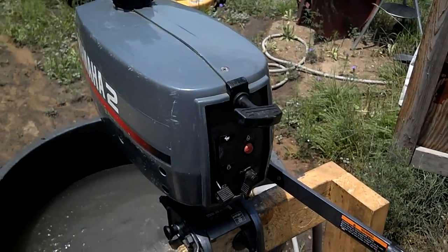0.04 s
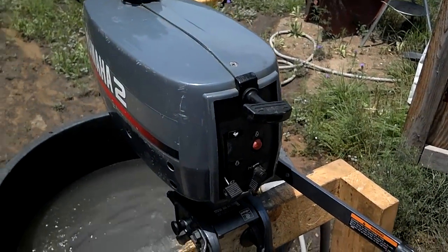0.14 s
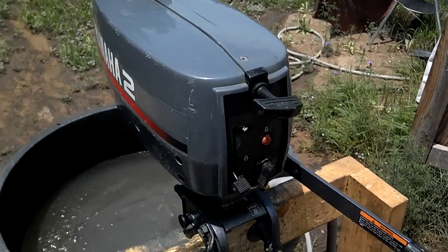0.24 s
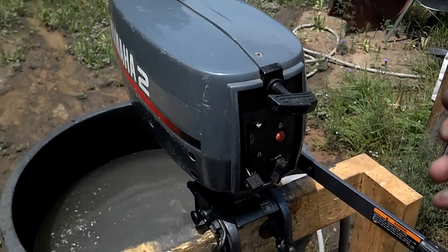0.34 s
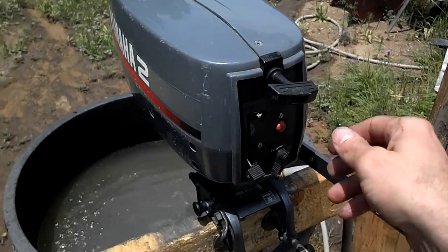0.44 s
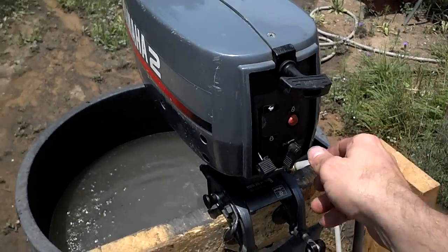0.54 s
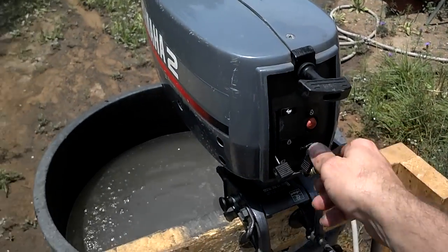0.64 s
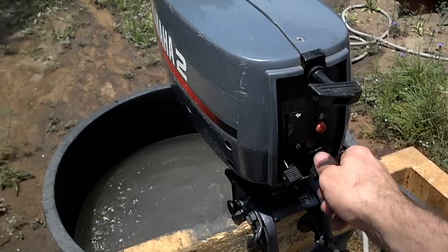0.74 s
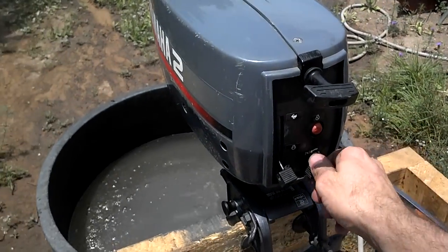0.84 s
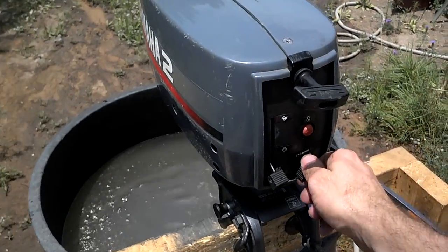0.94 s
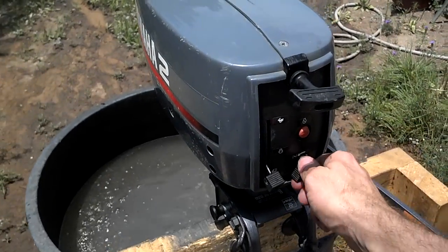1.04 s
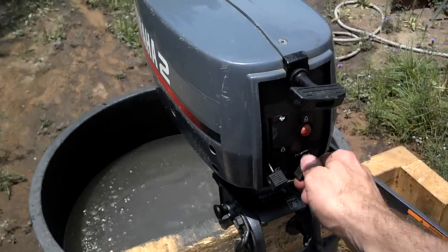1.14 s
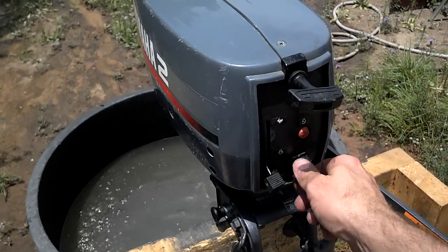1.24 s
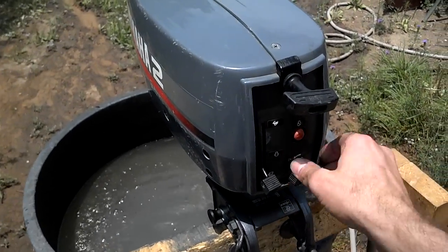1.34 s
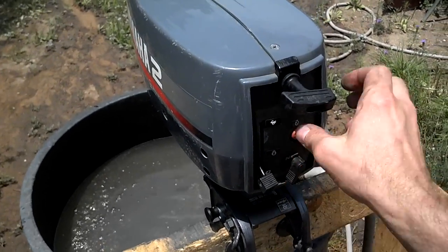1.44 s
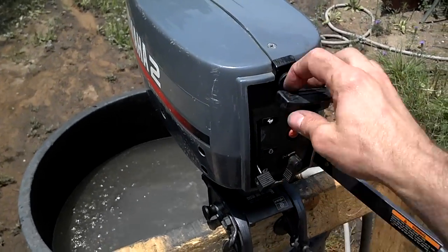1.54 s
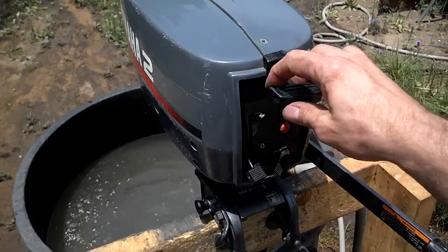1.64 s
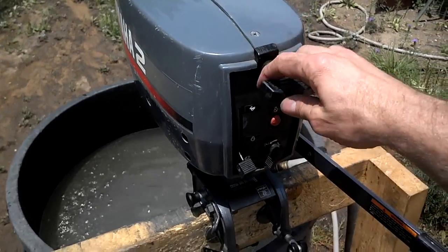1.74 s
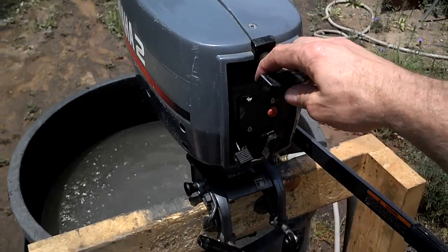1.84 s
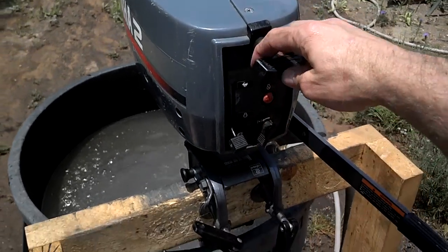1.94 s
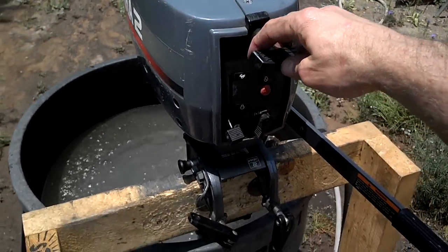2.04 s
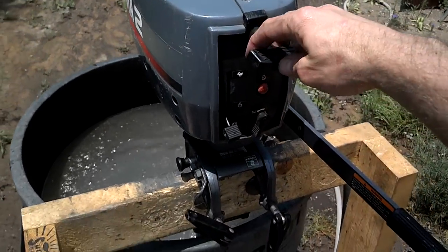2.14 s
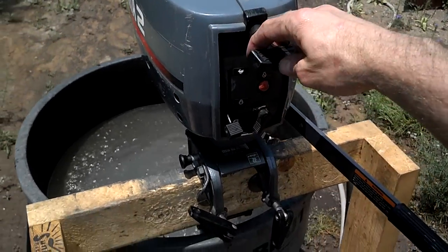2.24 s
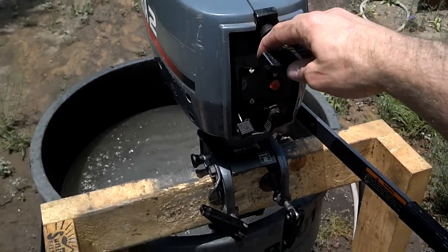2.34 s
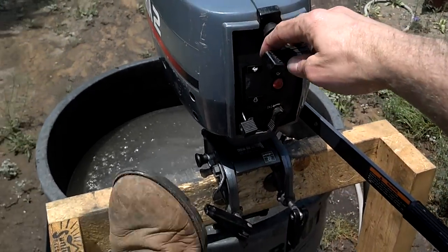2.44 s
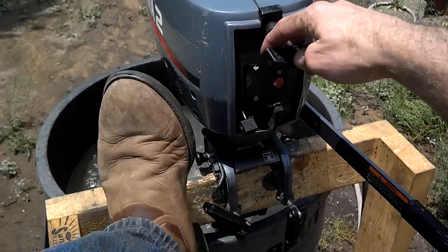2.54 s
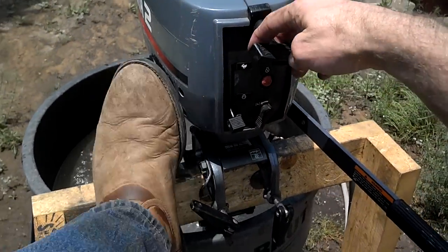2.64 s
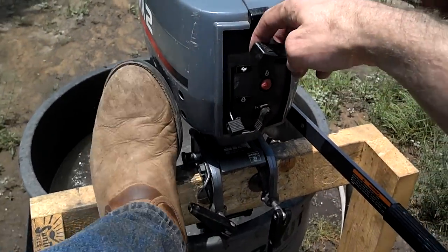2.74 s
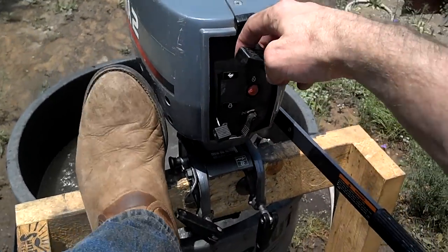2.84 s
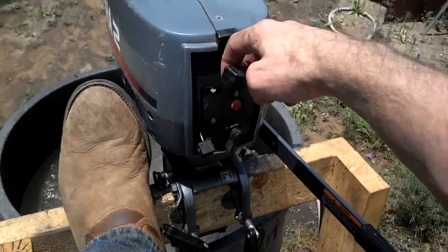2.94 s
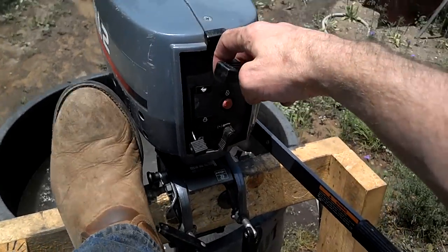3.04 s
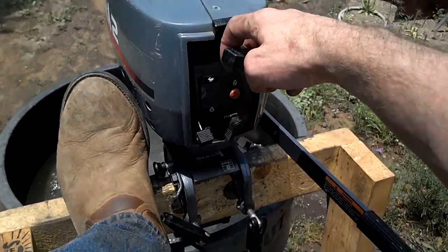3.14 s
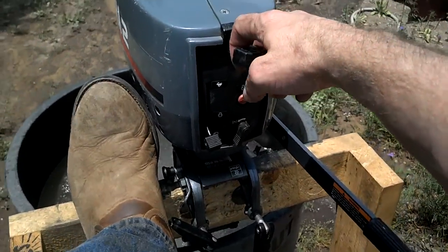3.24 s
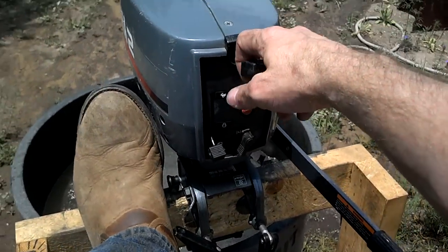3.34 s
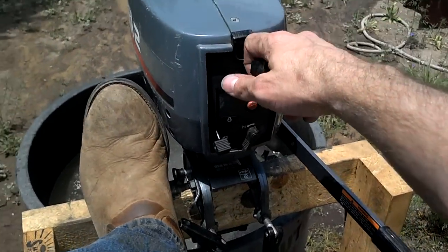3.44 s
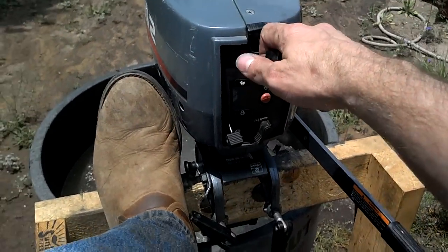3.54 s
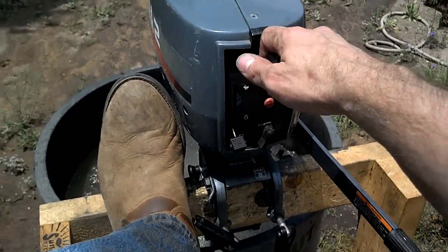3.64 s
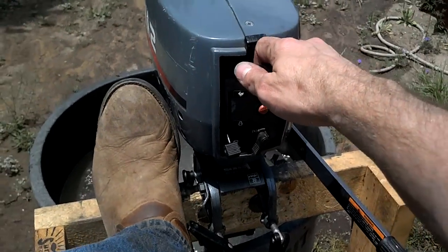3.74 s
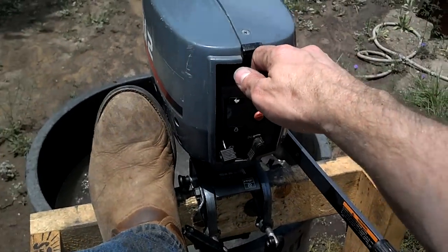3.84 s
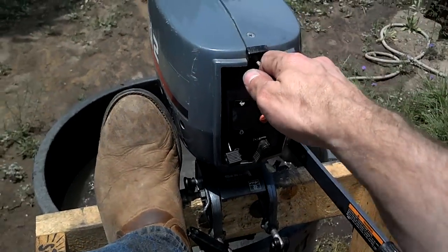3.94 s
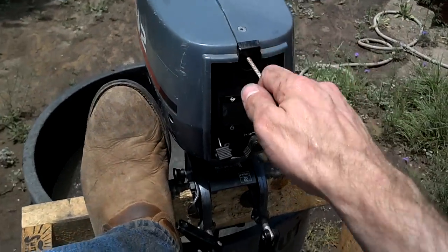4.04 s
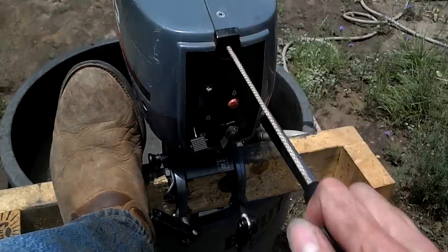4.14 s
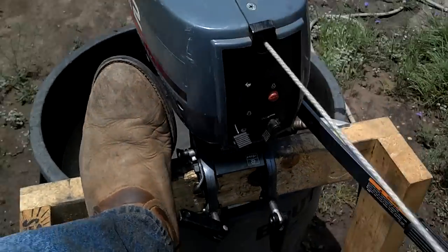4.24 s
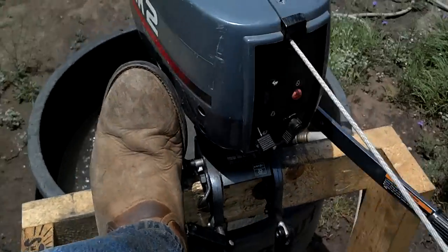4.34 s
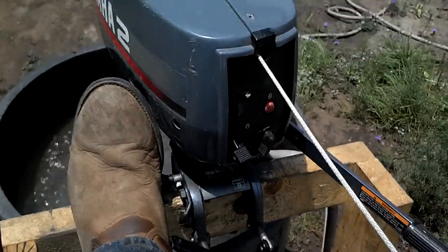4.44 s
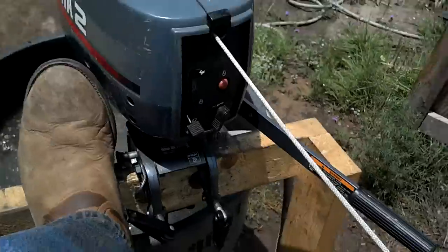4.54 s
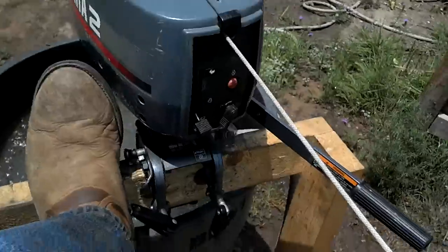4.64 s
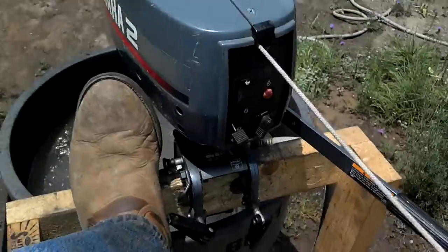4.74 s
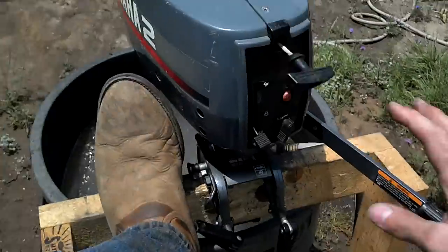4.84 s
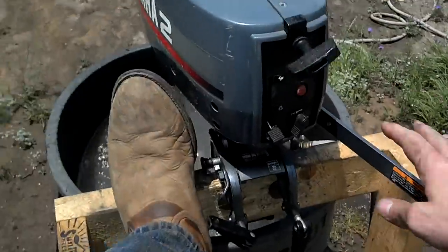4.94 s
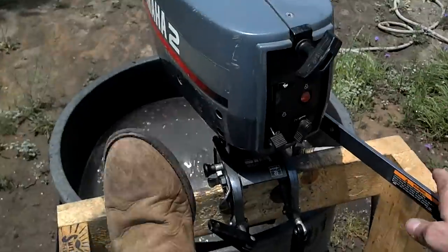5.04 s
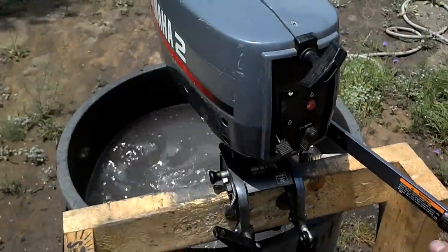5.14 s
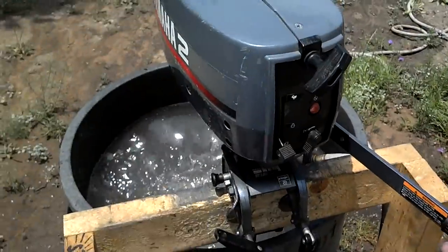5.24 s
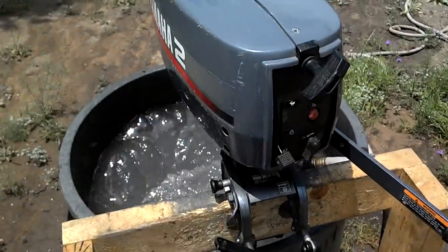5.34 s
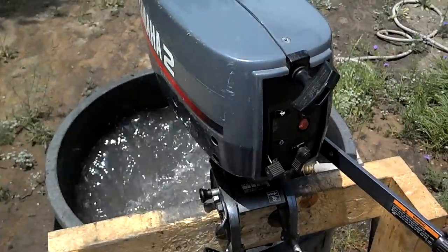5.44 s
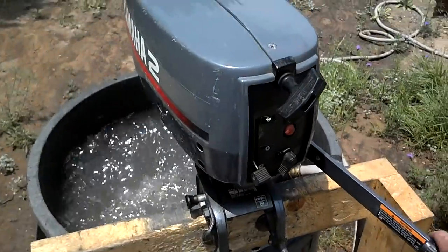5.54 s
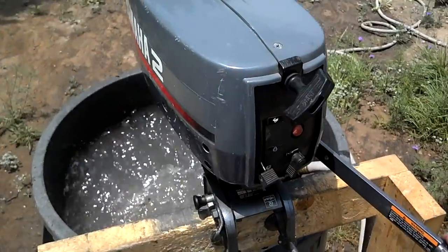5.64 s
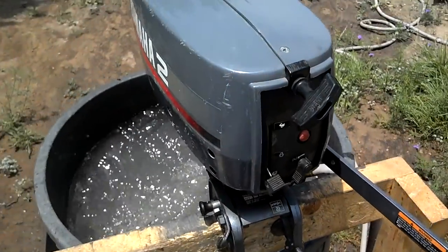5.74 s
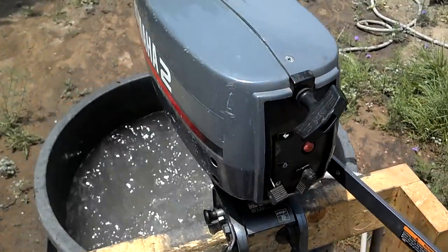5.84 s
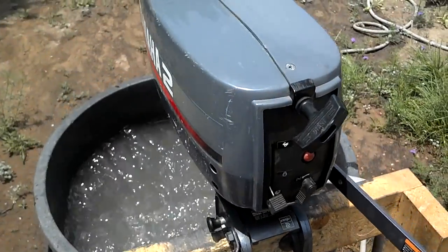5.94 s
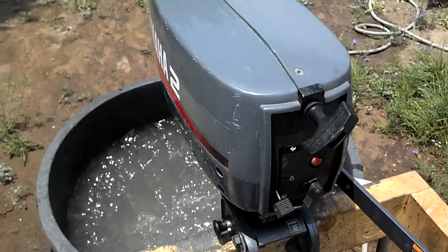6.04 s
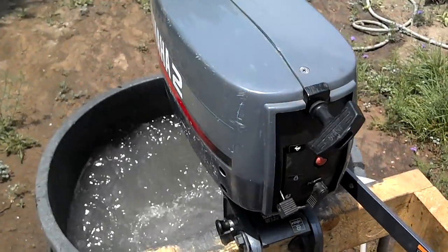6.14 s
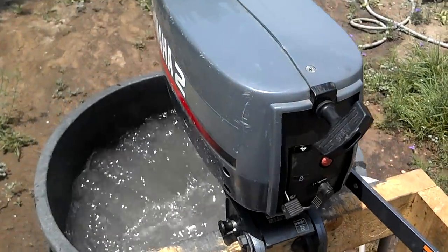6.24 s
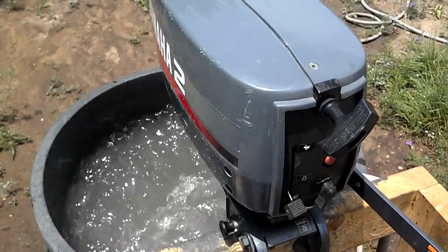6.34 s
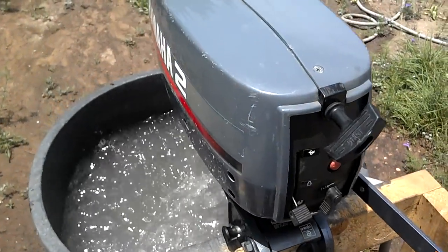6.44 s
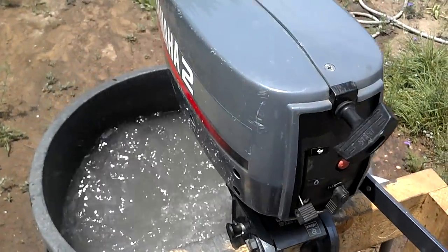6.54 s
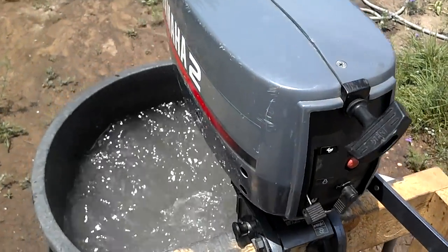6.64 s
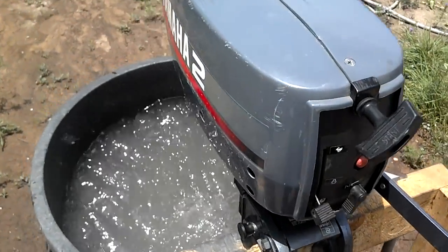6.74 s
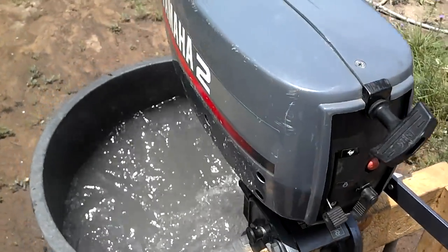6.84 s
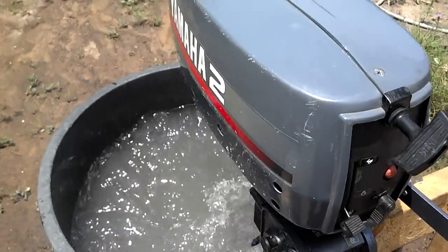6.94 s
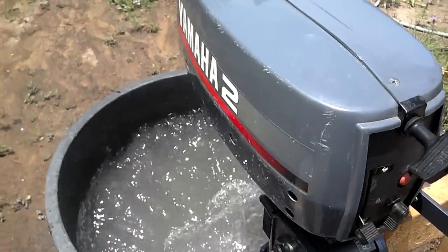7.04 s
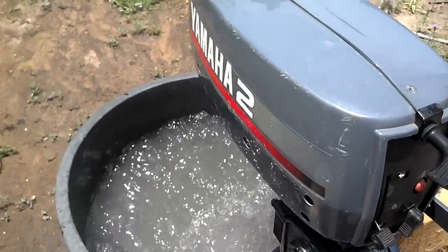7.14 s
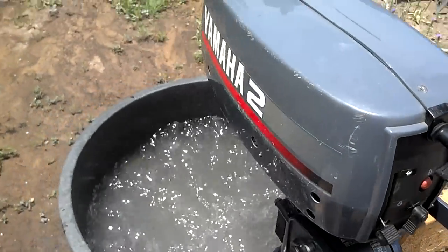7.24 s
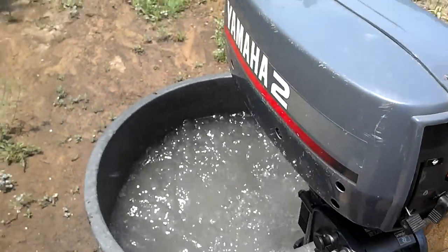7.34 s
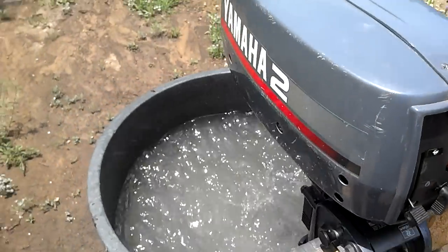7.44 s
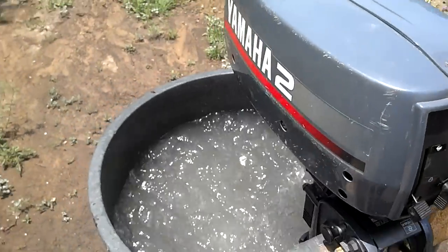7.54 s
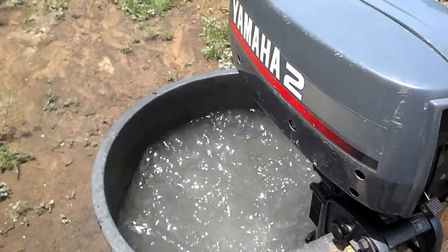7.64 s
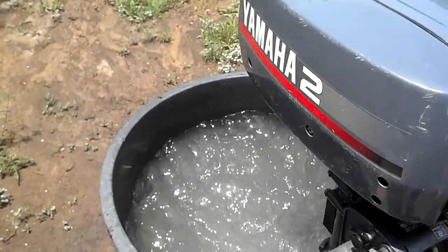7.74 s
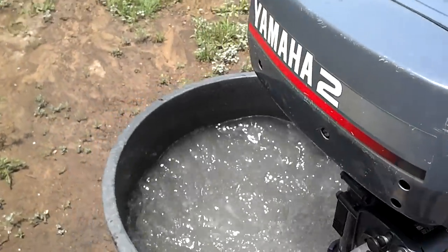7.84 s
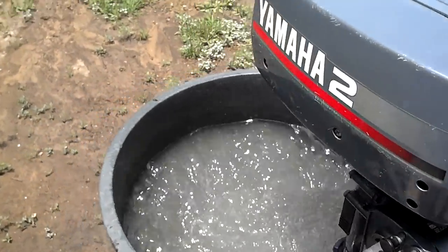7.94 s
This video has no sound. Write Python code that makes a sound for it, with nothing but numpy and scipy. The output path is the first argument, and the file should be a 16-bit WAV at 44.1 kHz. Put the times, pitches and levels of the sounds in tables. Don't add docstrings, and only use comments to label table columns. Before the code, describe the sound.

In an open yard, a thin stream trickles and plinks into a plastic barrel over a faint distant fan hum. A boot thuds on a wooden stand, small clicks follow, then a starter rope rasps rapidly and clanks free. A small two-stroke outboard catches, puttering at about twenty beats a second with rattling cowl and churning water. Close handheld stereo microphone, light wind bumps.

```python
import sys
import numpy as np
from scipy import signal
from scipy.fft import rfft, irfft, next_fast_len
from scipy.io import wavfile
from scipy.ndimage import uniform_filter1d, map_coordinates

SR = 44100
rng = np.random.default_rng(int(sys.argv[2]) if len(sys.argv) > 2 else 0)


def natural_amplitude(level_db):
    exponent = np.asarray(level_db, float) / 20
    return 10 ** exponent


def file_out(sig):
    cols = np.atleast_2d(sig).T
    lim = np.clip(cols, -1, 1)
    pcm = np.round(lim * 32767).astype(np.int16)
    wavfile.write(sys.argv[1], SR, pcm)


N = 352800
TIME = np.arange(N) / SR
PAWL_S = 4.475

# time in seconds, level in dB.
FIRING_LEVEL = [(4.16, -36), (4.2, -44), (4.26, -32), (4.33, -25), (4.38, -29.5), (4.44, -27.5),
                (4.54, -27), (4.7, -28.5), (5.03, -27.5), (5.4, -25.5), (5.65, -23), (6.2, -23.5),
                (6.65, -27), (7.0, -28.5), (7.25, -27.5), (7.45, -26.5), (7.65, -30.5), (8.0, -28)]
# time in seconds, firings a second.
SPEED = [
    (4.072, 21.178),
    (4.75, 20.656),
    (5.1, 18.596),
    (5.4, 19.196),
    (5.65, 19.555),
    (6.6, 20.141),
    (8.05, 20.639),
]
# time in seconds, share of the side view from 0 to 1.
WALK = [
    (4.5, .6),
    (5.0, 0.35),
    (5.8, 0.3),
    (6.3, 0.3),
    (6.75, 0.89),
    (7.5, 0.85),
    (8, 1),
]
# four dB values for thump, crack, intake hiss and churn.
# From the front, over the firing strength, in dB.
FRONT_DB = (0.5, -5.5, -19, -7.5)
SIDE_DB = (0.64, 0.18, 5.5, 0.66)
PULLED_DB = (-2.5, -9, 3, 3)
# seconds after firing, level in dB.
ECHOES = [
    (.004, 0),
    (.0116, -9),
    (.0193, -14),
    (.0269, -19),
]
# pitch in Hz, width in Hz, level in dB.
LEG_FRONT = [(212, 34, 1.5), (260, 124, -9.5), (314.5, 8.8, 3.5), (396, 28, 2), (497, 14, -15),
             (551, 24.5, -3), (682.5, 11.3, 2.5), (870, 33, 0.5)]
# pitch in Hz, width in Hz, level in dB.
LEG_SIDE = [(212, 32, -2), (276.4, 47, -8.5), (334, 10.7, 3), (387, 30, -6), (435.3, 11.6, -2),
            (476, 31.6, -5), (613, 28, -11), (1799, 83, -9.5)]
# time in seconds, level in dB.
SLOSH = [(4.5, -2), (5.2, -8), (5.6, -2), (5.9, -2.5), (6.2, -7), (6.6, -5), (7.0, -7.5), (7.25, -1.5),
         (7.45, -0.5), (7.65, -1.5), (8.0, -6.5)]
# pitch in Hz, width in Hz, level in dB.
COWL = [(944, 93, 12.5), (1150, 264, 12), (1362, 82, 7), (1580, 80, 8), (1715, 700, 6), (2890, 930, 3.5),
        (4100, 4300, -12.5), (8600, 2600, -15), (15600, 500, -12)]
# frequency in Hz, level in dB.
SLAP = [(2200, -23), (3400, 0.5), (4800, -15), (6500, 1.5), (8500, 5), (10500, -5.5), (16000, -12)]
# pitch in Hz, width in Hz, level in dB.
REED = [(3300, 2400, 1), (6060, 420, 2.5), (6555, 450, 5.5), (9100, 2250, -1.5), (11340, 470, 2),
        (14790, 2700, -2.5)]
# time in seconds, half length in seconds, level in dB.
GASP = (4.203, 0.022, -32.5)
# frequency in Hz, level in dB.
CHURN = [(150, -16), (300, 14.5), (800, 1), (1500, 2.5), (2500, -1.5), (4500, -9), (5700, -16),
         (8000, -13.5), (10500, -17.5), (16000, -46)]

# time in seconds, clicks a second, level in dB.
ROPE = [
    (3.9, 40, -60),
    (4.0, 50, -46),
    (4.15, 80, -43),
    (4.24, 140, -35),
    (4.35, 180, -32),
    (4.46, 200, -33),
    (4.48, 200, -70),
]
# time in seconds, pitch in Hz, level in dB.
WHIRR = [
    (4.06, 298.5, -59),
    (4.15, 335.8, -38),
    (4.201, 344.4, -29),
    (4.251, 369, -36),
    (4.35, 369.6, -36.5),
    (4.461, 384.3, -27.5),
    (4.49, 384, -62),
]
# time in seconds, peak in dB, seconds to fall 60 dB.
STROKES = [(4.113, -23.5, 0.067), (4.182, -34, 0.06), (4.235, -28, 0.07), (4.245, -23, 0.065),
           (4.26, -8.5, 0.052), (4.304, -8.5, 0.071), (4.325, -14.5, 0.05), (4.353, -14, 0.081),
           (4.4, -14, 0.078), (4.423, -19, 0.054), (4.463, -15, 0.075)]
# pitch in Hz, level in dB, seconds to fall 60 dB.
PAWL = [(3080, -38, .2), (5772, -33, .3), (5790, -44, .2), (14270, -35, .1), (14580, -36, .08),
        (14060, -39, .07)]
# time in seconds, peak in dB, crack
# over the peak in dB, seconds for the thud to fall 60 dB, seconds for the crack to fall 60 dB.
KNOCKS = [(0.004, -35.5, 6.5, 0.12, 0.36), (2.68, -14, -3.5, 0.075, 0.051), (2.967, -37, 20.5, 0.13, 0.024),
          (2.976, -46, 18, 0.09, 0.065), (3, -45.5, 14.5, 0.081, 0.04), (3.024, -37, -5, 0.12, 0.036),
          (3.199, -34.5, 2, 0.24, .04), (3.527, -35, -2, 0.075, 0.054), (3.801, -36, -1, 0.065, .04),
          (3.844, -36.5, 6, .06, .05), (3.902, -47, 17, .09, 0.087), (3.978, -26, 2.5, 0.13, 0.11),
          (4.019, -33.5, 8.5, 0.065, 0.045), (4.062, -19, -6, 0.092, 0.12), (4.472, -25, 18, 0.19, 0.039),
          (4.9195, -14.5, -8, 0.086, 0.074), (4.9259, -15.5, -9, 0.052, 0.057),
          (4.933, -23.5, 4, 0.13, 0.084), (4.943, -36, 0, 0.062, 0.063)]
# pitch in Hz, width in Hz, level in dB.
STAND = [(183, 40, -8), (256, 49, 1), (338, 49, 10), (407, 77, 8), (600, 360, -8.5), (1150, 74, -22)]
# frequency in Hz, level in dB.
SNAP = [(300, -19), (1100, 2), (1900, -9), (4000, -9), (6800, -38), (10000, -41), (14300, -39),
        (17000, -30)]
# time in seconds, level in dB, seconds to fall 60 dB.
TICKS = [(0.121, -32.5, 0.11), (0.154, -34, .03), (.54, -31, 0.027), (.65, -32, 0.027), (2.967, -42, 0.015),
         (3.402, -37, .03), (3.975, -27.5, 0.025), (3.953, -36, 0.043), (4.097, -30, 0.02),
         (4.471, -17.5, 0.061), (4.916, -42, 0.06), (4.93, -34, 0.14), (7.641, -28.5, 0.061),
         (7.665, -44, 0.035)]

# time in seconds, peak in dB, pitch in Hz.
DRIPS = [(0.058, -22.5, 730), (0.122, -27, 1105), (0.155, -21, 870), (0.196, -27, 1430), (0.228, -25, 1010),
         (0.262, -28, 1390), (0.401, -24, 1400), (0.442, -26.5, 1520), (0.59, -24.5, 1590),
         (0.67, -26, 1440), (0.704, -25, 1380), (0.856, -28, 1580), (0.907, -27, 1270), (0.982, -35, 1410),
         (1.175, -20.5, 1400), (1.217, -29, 1410), (1.259, -31, 840), (1.286, -20.5, 1400),
         (1.347, -31, 1270), (1.438, -37, 1410), (1.537, -29, 1430), (1.622, -27, 1400), (1.644, -21, 1450),
         (1.674, -24, 990), (1.724, -32, 1430), (1.935, -34, 1090), (2.042, -32, 1390), (2.098, -37, 877),
         (2.213, -21, 1150), (2.275, -30, 805), (2.314, -29, 1300), (2.346, -23, 1340), (2.681, -18, 940),
         (2.821, -26, 1400), (2.966, -29, 990), (2.995, -18, 1130), (3.472, -27, 825), (3.558, -24, 970),
         (3.829, -23, 1120), (3.909, -27, 1160)]
# time in seconds, peak in dB, pitch in Hz.
SPATTER = [(0.0308, -27, 4080), (0.123, -28, 3310), (0.162, -31, 5260), (0.2415, -20, 4300),
           (0.2658, -22, 2940), (0.3022, -31, 3910), (0.3227, -42, 3380), (0.364, -34, 3880),
           (0.4224, -39, 5200), (0.5364, -25, 3280), (0.6499, -36, 3550), (0.6792, -16.5, 2850),
           (0.743, -22, 3300), (0.7911, -38, 2670), (0.844, -38, 3490), (0.8916, -28, 3340),
           (0.999, -18.5, 2690), (1.0475, -29, 3240), (1.116, -28, 3830), (1.1807, -25.5, 3400),
           (1.2171, -35, 3220), (1.255, -27, 3270), (1.288, -32, 4450), (1.3269, -33, 3240),
           (1.392, -29, 3290), (1.4506, -34, 2800), (1.4792, -18, 2730), (1.529, -17, 2750),
           (1.8003, -20.5, 2670), (1.8806, -40, 3060), (1.968, -18, 2790), (2.064, -23, 2730),
           (2.1046, -27, 3020), (2.225, -28, 3250), (2.276, -28.5, 3240), (2.3231, -32, 3480),
           (2.3795, -23, 4340), (2.4129, -25.5, 3220), (2.4673, -30, 3500), (2.531, -29, 3080)]
# time in seconds, peak in
# dB, pitch in Hz.
LATE_SPATTER = [(2.7203, -43, 3420), (2.7792, -34, 3230), (2.9678, -35, 4060), (3.0494, -33, 3150),
                (3.2581, -40, 3290), (3.3128, -41, 3260), (3.404, -28, 3040), (3.4526, -40, 3830),
                (3.494, -27, 3200), (3.523, -33, 3100), (3.6018, -37, 2930), (3.6256, -33, 3290),
                (3.738, -31, 3780), (3.7825, -27.5, 3820), (3.8067, -33, 3280), (3.906, -42, 3200),
                (3.946, -28, 4100)]
# frequency in Hz, level in dB.
STREAM = [(200, 3.5), (500, -11.5), (800, 3.5), (1500, 3.5), (2700, 2), (4500, -2.5), (5800, -11.5),
          (7500, -6), (11000, -19), (16000, -15.5)]
# pitch in Hz, width in Hz, level in dB.
DRUM = [(1400, 50, 3), (2233, 34, 10), (2692, 173, 11.5), (3280, 180, 2.5), (4435, 260, 1)]
# time in seconds, level in dB, half length in seconds.
RUSTLES = [
    (1.943, 4.5, 0.19),
    (2.487, 12.5, 0.13),
    (3.07, 10, 0.21),
    (3.75, 2, 0.069),
]
# start in seconds, end in seconds, fade in seconds, share left.
SHADE = (2.48, 4.3, 0.12, 0.74)
# pitch in Hz, width in Hz, level in dB.
HUM = [(232.4, 24, -2), (294, 28, -1), (370, 95, -1), (498, 183, -5)]
# pitch in Hz, level over the hum in dB.
HUM_LINES = [(82, -22), (120, -8.5), (139, -4.5), (167, -12.5), (224, -13), (295, -4.5), (478, -18)]
# start in seconds, length in seconds, first pitch in Hz, last pitch in Hz, level in dB.
CHIRP = [
    (1.41, .1, 4700, 3400, -41),
    (3.425, .08, 4400, 3400, -45),
]
# time in seconds, level in dB, length in seconds.
GUSTS = [(0.057, -34, 0.032), (0.49, -36, .03), (0.576, -31, 0.022), (2.6, -41, 0.065), (3.203, -56, 0.061),
         (3.73, -40, 0.15), (3.895, -19.5, 0.018), (5.033, -31, 0.016), (5.805, -37, 0.024),
         (6.123, -19.5, 0.018), (6.295, -27.5, 0.089), (7.99, -45, 0.022)]
# frequency in Hz, level in dB.
BUFFET = [(15, -50), (45, -45), (75, 5), (110, 7), (170, 12), (300, -13), (600, -41)]

# frequency in Hz, phase in radians.
LEAD = [(30, 3), (150, 1), (300, .55), (650, .6), (950, 0), (1500, 0), (2440, 3.14), (3700, 6.3),
        (4790, 9.42), (6000, 14), (7800, 9.4), (9900, 3.14), (12600, 9.4), (15100, 15.2), (16000, 14.5)]
# frequency in Hz, share from 0 to 1.
ALIKE = [(100, 1), (1800, 0.69), (3000, 0.054), (5000, 0.4), (7000, 0.34), (9000, .2), (13000, .1)]
# frequency in Hz, level in dB.
LEFT = [(60, 1), (250, -2), (600, -0.5), (950, -1.5), (2420, 2.5), (4700, -1.6), (5800, -8.5), (7500, 0),
        (15000, -3.5)]
# time in seconds, drop in dB.
DUCKS = [
    (2.686, 9),
    (4.481, 12.5),
    (4.93, 11),
]
# frequency in Hz, level in dB.
MIC = [(15, -16), (45, -7), (90, 0), (15750, 0), (15900, -60)]


def unit(x):
    return x / np.sqrt(np.mean(x ** 2) + 1e-20)


def along(points, hz):
    f, v = np.transpose(points)
    return np.interp(np.log(hz + 1), np.log(f + 1), v)


def over_time(points):
    return np.interp(TIME, *np.transpose(points))


def wobble(rate):
    coarse = np.arange(0, N + 16, 16)
    knots = rng.standard_normal(int(N * rate / SR) + 4)
    return np.interp(np.arange(N), coarse, map_coordinates(knots, [coarse * rate / SR]))


def noise():
    return rng.standard_normal((2, N))


def filtered(x, response):
    m = next_fast_len(N + SR // 2)
    return irfft(rfft(x, m) * response(np.fft.rfftfreq(m, 1 / SR)), m)[..., :N]


def resonant(x, modes):
    def response(f):
        total = 0
        for k, (centre, width, db) in enumerate(modes):
            damping = 1j * f * width
            total = total + (-1) ** k * natural_amplitude(db) * damping / (centre ** 2 - f ** 2 + damping)
        return total
    return filtered(x, response)


def coloured(x, spectrum):
    return filtered(x, lambda hz: natural_amplitude(along(spectrum, hz)))


def patchy(x, size, bins, frames, depth_db):
    z = signal.stft(x, nperseg=size)[2]
    field = uniform_filter1d(rng.standard_normal(z.shape[1:]), bins, 0)
    field = uniform_filter1d(field, frames, 1)
    return unit(signal.istft(z * natural_amplitude(depth_db * unit(field)), nperseg=size)[1][:, :N])


def bursts(events, rise_s):
    return sum(natural_amplitude(db - 60 * abs(TIME - s) / t60) * np.clip((TIME - s) / rise_s, 0, 1)
               for s, db, t60 in events)


def crank():
    speed = np.interp(TIME, *np.transpose(SPEED), left=0)
    turn = np.cumsum(speed) / SR + 0.0067 * wobble(15)
    whole = np.floor(turn).astype(int)
    size = rng.standard_normal((whole.max() + 2, 3))[whole + 1].T
    fires = np.diff(whole, prepend=-9) > 0
    since = np.arange(N) - np.maximum.accumulate(np.arange(N) * fires)
    patterns = rng.standard_normal((14, SR // 8))
    habit = map_coordinates(patterns, [turn / 12 + 2, np.minimum(since, SR // 9)], order=1)
    habit = habit / np.hypot(turn / 12 % 1, 1 - turn / 12 % 1)
    return turn - whole, size, since, habit


def lobe(angle, at, rise, fall):
    after = (angle - at) % 1
    return np.clip(after / rise, 0, 1) * np.exp(-after / fall)


def exhaust_thump(angle, size, since, habit, side):
    push = sum(natural_amplitude(db + 2 * wobble(3)) * np.exp(-((since / SR - s) / .00012) ** 2) for s, db in ECHOES)
    gargle = (lobe(angle, -.1, .14, .24) + .13) * (habit + .4 * noise())
    blow = natural_amplitude(.7 * size[0]) * (1.1 * unit(push - push.mean()) + 2.8 * unit(gargle))
    thump = (1 - side) * unit(resonant(blow, LEG_FRONT)) + side * unit(resonant(blow, LEG_SIDE))
    barrel_note = unit(resonant(blow, [(262, 30, 0)]))
    thump = thump + natural_amplitude(over_time(SLOSH)) * barrel_note
    thump = unit(resonant(thump, [(536, 9400, 0)]))
    thump = coloured(thump, [(60, -31), (110, -22), (150, -8), (190, 2.0)])
    return natural_amplitude(-1) * patchy(thump, 2048, 3, 20, 1.1)


def cowl_crack(angle, size, habit):
    burn = np.exp(-(((angle + .2) % 1 - .275) / .145) ** 2)
    burn = burn + .25 * lobe(angle, .1, .1, .2) + .16 * lobe(angle, .5, .08, .15) + .05
    crack = unit(resonant(natural_amplitude(.9 * size[1]) * burn * (.7 * noise() + habit), COWL))
    slap = unit(coloured(natural_amplitude(size[2]) * burn ** 2 * noise(), SLAP))
    crack = crack + natural_amplitude(-12.5) * slap
    return patchy(coloured(crack, [(600, -12), (950, 0)]), 512, 3, 6, 1.4)


def reed_hiss(angle, size):
    suck = np.exp(-((angle - .64) / 0.19) ** 4)
    air = natural_amplitude(1.5 * size[2]) * (suck + .22) * noise()
    hiss = unit(resonant(resonant(air, REED), REED))
    return patchy(hiss, 1024, 2, 3, 2.8)


def propeller_churn():
    return unit(coloured(natural_amplitude(1.7 * wobble(30) + 3.9 * wobble(300)) * noise(), CHURN))


def engine():
    angle, size, since, habit = crank()
    side = np.clip(over_time(WALK), 0, 1)
    layers = (exhaust_thump(angle, size, since, habit, side), cowl_crack(angle, size, habit),
              reed_hiss(angle, size), propeller_churn())
    cold_db, cold_s = (-0.54, 0.52, 0.32, -1.7), 4.4
    cold = (TIME > PAWL_S) * np.clip((cold_s - TIME) / 0.18 + .5, 0, 1)
    layers_db = np.c_[list(FRONT_DB)] + np.outer(SIDE_DB, side) + np.outer(PULLED_DB, TIME < PAWL_S)
    layers_db = layers_db + np.outer(cold_db, cold) + over_time(FIRING_LEVEL)
    gulp_s, half_s, gulp_db = GASP
    gulp = natural_amplitude(gulp_db) * np.exp(-((TIME - gulp_s) / half_s) ** 4) * unit(resonant(noise(), REED[1:3]))
    running = np.clip((TIME - 4.1) / 0.15, 0, 1)
    return running * sum(natural_amplitude(db) * layer for db, layer in zip(layers_db, layers)) + gulp


def rope():
    s, rate, db = np.transpose(ROPE)
    teeth = np.cumsum(np.interp(TIME, s, rate) * natural_amplitude(1.5 * wobble(40))) / SR
    clicks = np.exp(-(teeth % 1) / .12) * natural_amplitude(3 * wobble(90)) * noise()
    cowl = [(860, 150, 0), (1400, 160, -16), (3300, 1000, -24), (6800, 280, -25)]  # Hz, width Hz, dB
    rasp = unit(resonant(clicks, STAND[2:] + cowl))
    return natural_amplitude(np.interp(TIME, s, db, -120, -120)) * rasp


def strokes():
    return natural_amplitude(-6) * bursts(STROKES, 0.0016) * unit(resonant(noise(), COWL))


def pulley():
    s, hz, db = np.transpose(WHIRR)
    phase = 2 * np.pi * np.cumsum(np.interp(TIME, s, hz)) / SR + 1.5 * wobble(70)
    level_db = np.interp(TIME, s, db, -120, -120) + 5 * wobble(60)
    return natural_amplitude(level_db) * (np.sin(phase) + 0.15 * np.sin(3 * phase))


def knocks():
    thud, crack, ring = np.zeros((2, N)), np.zeros((2, N)), np.zeros(N)
    t = np.arange(SR // 3) / SR
    for s, db, crack_db, t60, crack_t60 in KNOCKS:
        at = slice(round(s * SR), round(s * SR) + len(t))
        shake = rng.standard_normal((2, len(t))) * natural_amplitude(-60 * t / t60)
        push = 0.9 * t / 0.00078 * np.exp(-t / 0.00046)
        thud[:, at] += natural_amplitude(db + 22) * (push + 0.28 * shake * (1 - np.exp(-t / 0.0039)))
        fall = natural_amplitude(db + crack_db + 8 - 60 * t / crack_t60) * (1 - np.exp(-t / .0025))
        click = 3.5 * (abs(t - .002) < .00008)
        crack[:, at] += fall * (rng.standard_normal((2, len(t))) + click)
    pawl = sum(natural_amplitude(db - 60 * t / t60) * np.sin(2 * np.pi * hz * t) for hz, db, t60 in PAWL)
    ring[round(PAWL_S * SR):][:len(t)] = pawl
    return resonant(thud, STAND) + coloured(crack, SNAP) + ring


def ticks():
    bright = [(1500, -20), (4000, 13.5), (7000, 9.5), (10000, 4.0), (14500, 3.0)]  # Hz, dB
    return bursts(TICKS, 0.0013) * unit(coloured(noise(), bright))


def bubble(hz, t60, slide, rise_s):
    t = np.arange(SR // 16) / SR
    tone = np.sin(2 * np.pi * hz * t * (1 + slide * t))
    return tone * natural_amplitude(-60 * t / t60) * (1 - np.exp(-t / rise_s))


def drips():
    out, wall = np.zeros(N + SR), np.zeros(N + SR)
    t = np.arange(SR // 16) / SR
    for s, db, hz in DRIPS:
        out[round(s * SR):][:len(t)] += natural_amplitude(db - 4.5) * bubble(hz, 0.04, 0.81, 0.00028)
    later_spatter = [(s, db + 1, hz) for s, db, hz in LATE_SPATTER]
    for s, db, hz in list(SPATTER) + later_spatter:
        out[round(s * SR):][:len(t)] += natural_amplitude(db - 1.0) * bubble(hz, 0.043, 0.81, 0.00028)
        rattle = rng.standard_normal(len(t)) * natural_amplitude(-60 * t / 0.031) * (1 - np.exp(-t / 0.0023))
        wall[round(s * SR):][:len(t)] += natural_amplitude(db + 3) * rattle
    wall_colour = [(1800, -40), (2700, 1), (4200, -2.5), (6500, -12), (10000, -21), (16000, -20)]  # Hz, dB
    return out[:N] + coloured(wall[:N], wall_colour)


def gurgles():
    out = np.zeros(N + SR)
    for when, pitch, size, slide in rng.random((260, 4)):
        gurgle = bubble(500 * 7 ** pitch, 0.082, 5 * (slide - .4), 0.0027)
        out[round(when * 4.4 * SR):][:len(gurgle)] += natural_amplitude(-14 * size) * gurgle
    return out[:N]


def trickle():
    start, end, fade, left = SHADE
    screened = 1 - (1 - left) * np.clip(np.minimum(TIME - start, end - TIME) / fade + .5, 0, 1)
    flow = natural_amplitude(0.53 * wobble(9) + 1.25 * wobble(60) + 1.6 * wobble(400)) * noise()
    stream = patchy(unit(coloured(flow, STREAM)), 1024, 4, 4, 3)
    wall = unit(resonant(natural_amplitude(3.0 * wobble(30) + 5.2 * wobble(150)) * noise(), DRUM)) * screened
    spray = natural_amplitude(2.5 * wobble(25.74) + 2.8 * wobble(120)) * noise()
    spray = unit(coloured(spray, [(3000, -4), (7000, 4.5), (10000, -1.0), (16000, -8)]))
    swell_db = sum(db * np.exp(-((TIME - s) / half) ** 2) for s, db, half in RUSTLES)
    water = natural_amplitude(-3.5) * stream + natural_amplitude(-2.5) * wall + natural_amplitude(2.0) * gurgles()
    return natural_amplitude(-35.5) * water + natural_amplitude(-54 + swell_db) * spray


def far_fan():
    hum = unit(resonant(resonant(noise(), HUM), [(278, 2000, 0)]))
    for hz, db in HUM_LINES:
        hum = hum + natural_amplitude(db + 2.4 * wobble(5)) * np.sin(2 * np.pi * hz * TIME + 1.29 * wobble(3.2))
    return natural_amplitude(-42.5) * hum


def yard():
    held_db = -2.5
    return natural_amplitude(held_db * (TIME > PAWL_S)) * (trickle() + far_fan()) + drips()


def bird():
    out = np.zeros(N)
    for s, length, from_hz, to_hz, db in CHIRP:
        u = np.arange(round(length * SR)) / (length * SR)
        cycles = length * (from_hz * u + (to_hz - from_hz) * u ** 2 / 2)
        out[round(s * SR):][:len(u)] = natural_amplitude(db) * np.sin(np.pi * u) * np.sin(2 * np.pi * cycles)
    return natural_amplitude(3 * wobble(70)) * out


def wind():
    buffet = unit(coloured(noise()[0], BUFFET))
    gusts = 0
    for s, db, length in GUSTS:
        after = TIME - s
        thump = 0.61 * buffet + 0.71 * np.sin(2 * np.pi * 105 * after)
        gusts = gusts + natural_amplitude(db) * np.exp(-(after / length) ** 2) * thump
    return gusts + natural_amplitude(-54.0 + 1.3 * wobble(2.1)) * buffet


def gain_control():
    climb_db_per_s, attack_s = 6.5, 0.0058
    drops = [np.clip(db - climb_db_per_s * (TIME - s), 0, None) * np.clip((TIME - s) / attack_s, 0, 1)
             for s, db in DUCKS]
    return natural_amplitude(-np.max(drops, axis=0))


def ports(paths):
    # (Hz, dB)
    creep = [(600, -10.0), (2400, -28), (3600, -18.5), (4750, -9.5), (6000, -3.5), (9000, -1.0)]

    def half_lead(hz):
        return np.interp(hz, *np.transpose(LEAD)) / 2

    def mid_response(hz):
        return np.array([np.cos(half_lead(hz)), 0.91 * natural_amplitude(along(creep, hz))])

    def side_response(hz):
        alike = np.clip(along(ALIKE, hz), 0, 1)
        shares = np.array([alike, np.sqrt(1 - alike ** 2)])
        return 1j * np.sin(half_lead(hz)) * shares + np.array([0 * hz, natural_amplitude(along(creep, hz))])

    mid = filtered(paths, mid_response).sum(axis=0)
    side = filtered(paths, side_response).sum(axis=0)
    pair = filtered(np.array([mid + side, mid - side]),
                    lambda hz: natural_amplitude(np.outer([.5, -.5], along(LEFT, hz))))
    push = wind()
    return pair + np.array([[1.01], [-1.04]]) * push + 0.17 * np.roll(push, SR // 400)


def scene():
    steady = gain_control() * (engine() + yard())
    starter = rope() + strokes() + pulley()
    return ports(steady + starter + knocks() + ticks() + bird())


def low_pass(x):
    return signal.sosfilt(signal.butter(12, 16450, fs=SR, output="sos"), x)


def record(dry):
    held = dry / (1 + np.abs(dry / .55) ** 4) ** .25
    finished = coloured(held, MIC)
    return low_pass(finished)


dry = scene()
out = record(dry)
file_out(out)
```